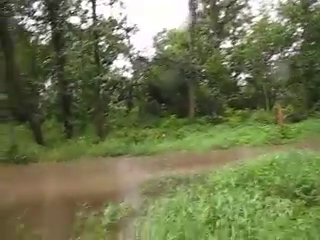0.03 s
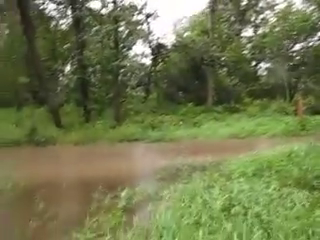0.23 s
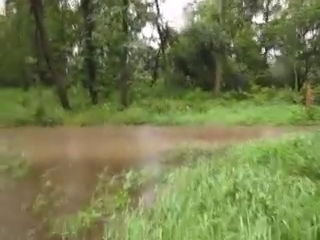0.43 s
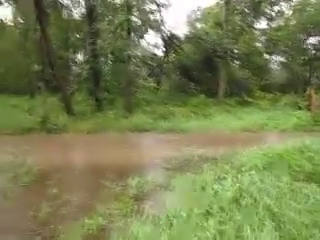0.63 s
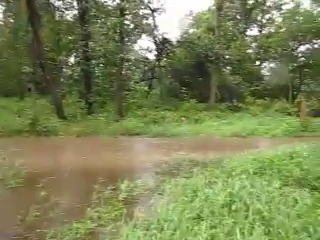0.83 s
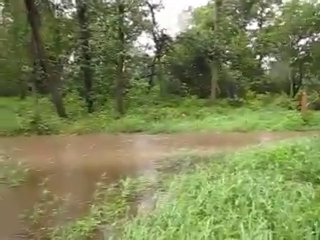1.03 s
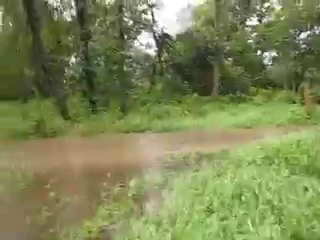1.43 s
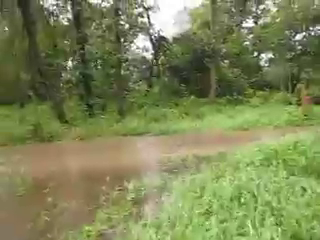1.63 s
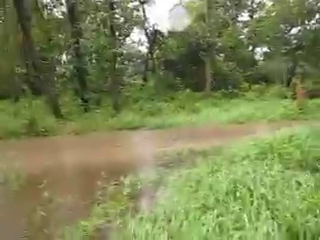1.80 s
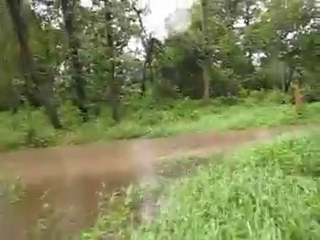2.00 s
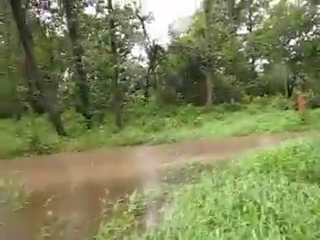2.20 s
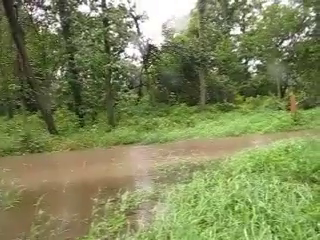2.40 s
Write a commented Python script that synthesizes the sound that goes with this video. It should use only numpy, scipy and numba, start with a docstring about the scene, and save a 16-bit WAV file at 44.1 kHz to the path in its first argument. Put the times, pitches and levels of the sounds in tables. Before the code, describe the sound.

Rain falls evenly over flooded, wooded ground. Big drops strike right by the microphone with sharp ticks, small plops and soft thumps, busy at first and sparser later, while light wind brushes the microphone.

```python
"""Rain with close drops

Steady rain hisses on grass, trees and flood water. Single drops strike a surface at the microphone:
each rings it briefly, thumps it and throws spray; some ping or plop in pockets of water.
Fine drops patter and crackle between them; light wind rumbles, with a few soft bumps.
The hardest hits overload the recorder, whose gain dips and creeps back."""
import sys
import numpy as np
from scipy import signal
from scipy.fft import rfft, irfft
from scipy.io import wavfile
from scipy.ndimage import uniform_filter1d
from numba import njit

SR = 44100
rng = np.random.default_rng(int(sys.argv[2]) if len(sys.argv) > 2 else 0)


def put_to_file(sound):
    """Save the sound as 16-bit audio at rate SR, in the file named by the first command-line argument."""
    columns = np.atleast_2d(sound).T  # one column per channel
    safe = np.clip(columns, -1, 1)
    whole_steps = np.round(safe * 32767)
    wavfile.write(sys.argv[1], SR, whole_steps.astype(np.int16))


N = 112454
HIT_S, RING_S = 0.005, 0.07  # level window, length of one short sound
RING_TIME_S = np.arange(int(RING_S * SR)) / SR


def near_drops():
    """Big drops strike the near surface one by one."""
    # start_s, ring_db, centre_hz, thump_db, spray_db, pan_db
    impacts = [(0.0445, -61, 590, -39.5, -35, 25), (0.053, -28, 3280, -46, -66, 11),
               (0.1113, -37, 1710, -33.5, -48, 0), (0.193, -35, 536, -31, -97, 15),
               (0.2125, -32.5, 4900, -37.5, -30, -4), (0.2568, -44, 4400, -65, -48, 6),
               (0.349, -44, 4600, -33.5, -35.5, 3), (0.358, -36, 2670, -34, -43, 9),
               (0.382, -37.5, 1450, -30.5, -41, 8), (0.3949, -39.5, 4770, -46, -38.5, 8),
               (0.414, -36.5, 1790, -33.5, -57, -8), (0.4238, -35.5, 1420, -38, -50, 29),
               (0.4457, -34.5, 4150, -40, -48, -14), (0.4901, -11.5, 1050, -20, -29.5, 8),
               (0.6143, -41.5, 3340, -44, -38, -18), (0.689, -37, 1500, -41, -53, -12),
               (0.709, -31, 378, -74, -71, 9), (0.7929, -32.5, 980, -25.5, -45.5, 7),
               (0.8021, -32.5, 710, -29.5, -55, 16), (0.879, -37, 446, -66, -49, 3),
               (0.902, -36, 955, -47, -36, 0), (0.9151, -28.5, 613, -45, -66, 20),
               (0.9446, -24, 1200, -28, -74, 17), (0.9763, -37, 2110, -53, -46.5, -15),
               (0.9934, -31.5, 706, -28.5, -66, 18), (1.0181, -60, 4200, -53, -43.5, 9),
               (1.0271, -28, 1420, -30, -37, 26), (1.0386, -34, 1320, -30, -70, 21),
               (1.1448, -27, 1570, -30.5, -26.5, -6.5), (1.2329, -20, 983, -22.5, -55, 2.5),
               (1.2547, -42, 2600, -53, -50.5, -19), (1.3051, -29.5, 1350, -32.5, -64, 12),
               (1.3084, -35.5, 756, -38, -53, 2), (1.342, -32, 784, -29, -64, -39),
               (1.3506, -27.5, 1530, -21, -28, -0.5), (1.3857, -48, 2280, -36, -47, -12),
               (1.4076, -34.5, 1280, -32, -63, 28), (1.4289, -24, 1034, -24, -48, 8.5),
               (1.4332, -29.5, 386, -46, -55, 28), (1.4836, -22, 1290, -37, -51, 12),
               (1.6212, -30, 714, -29, -73, 8), (1.6419, -29.5, 1140, -29.5, -43.5, -5),
               (1.7252, -33.5, 1050, -37, -74, -13), (1.751, -38.5, 2500, -47, -47, -8),
               (1.8924, -39, 1920, -70, -55, 10), (1.924, -46.5, 756, -53, -40.5, -6),
               (1.9727, -28, 2390, -30, -39, 13), (2.36, -36, 1970, -39, -37.5, -5),
               (2.4628, -42.5, 2630, -37.5, -47, -13), (2.5021, -37, 930, -31, -59, 2)]
    out = np.zeros((2, N))
    for start_s, *impact in impacts:
        add(out, start_s, drop(*impact))
    return out


def drop(ring_db, centre_hz, thump_db, spray_db, pan_db, echo_db=-11.5, echo_cycles=3.023, crack_db=-6):
    """One impact: contact crack, ring of the modes near centre_hz, low thump, tick of spray."""
    mode_hz, modes = surface_modes()
    struck = mode_weights(mode_hz, centre_hz, width_octaves=0.86) @ modes
    # the ring returns from the surface's edge within a few cycles
    lag_samples = (rng.random(2) + 1) / 2 * echo_cycles / centre_hz * SR
    echo = np.array([np.roll(side, int(lag)) for side, lag in zip(struck, lag_samples)])
    ring = unit(struck + undb(echo_db) * echo)
    hardness = min(centre_hz / 1540, 1) ** 2  # softer drops ring lower and crack less
    crack = undb(crack_db) * hardness * burst(low_hz=2300, high_hz=4440, t60_s=0.004)
    thump = unit(mode_weights(mode_hz, centre_hz=214, width_octaves=1) @ modes)
    spray = burst(low_hz=3600, high_hz=11600, t60_s=0.0071)
    return (hit_gain(ring_db, pan_db) * (ring + crack)
            + hit_gain(thump_db, 0.53 * pan_db) * thump
            + hit_gain(spray_db, 0.21 * pan_db - 3) * spray)


def surface_modes(pitch_scatter=0.11, scatter_db=5.5, settle_hz=2030):
    """Decaying modes vary with the place of impact; pitches above settle_hz vary little."""
    # pitch_hz, level_db, t60_s
    resonances = [(150, -1.5, 0.025), (212.4, -2, 0.024), (324, 0, 0.019), (448, 2, 0.013),
                  (632, -0.5, 0.029), (839, 3, 0.017), (1193, 3.5, 0.0076), (1554, 4.5, 0.015),
                  (2050, 5.5, 0.0067), (2960, 7.5, 0.0045), (3620, 8.5, 0.0072), (4520, 8.5, 0.0087),
                  (7300, 5, 0.0068), (12400, 3, 0.0076)]
    pitch_hz, level_db, t60_s = np.array(resonances, float).T
    count = len(pitch_hz)
    detune = rng.standard_normal((2, count, 1)) / np.hypot(1, pitch_hz[:, None] / settle_hz)
    detuned_hz = pitch_hz[:, None] * np.exp(pitch_scatter * detune)
    uneven_db = scatter_db * rng.uniform(-1.38, 1, (2, count, 1))
    swing = (-1) ** np.arange(count) * undb(level_db) / np.sqrt(t60_s)  # neighbours in antiphase
    envelope = swing[:, None] * decay(RING_TIME_S, t60_s[:, None]) * undb(uneven_db)
    return pitch_hz, np.sin(2 * np.pi * detuned_hz * RING_TIME_S) * envelope


def mode_weights(mode_hz, centre_hz, width_octaves):
    """An impact drives the modes near its centre pitch hardest."""
    return np.exp(-0.5 * (np.log2(mode_hz / centre_hz) / width_octaves) ** 2)


def pings(left_lag_s=0.00003, reference_hz=1490, reference_t60_s=0.013):
    """Struck pockets of water and air ring on one note: plops when low, glassy ticks when high."""
    # start_s, pitch_hz, level_db, pan_db
    pockets = [(0.2568, 4600, -31.5, -3), (0.491, 550, -17, 3), (0.491, 190, -24, 2), (0.491, 2730, -30, 0),
               (0.491, 4850, -28, 0), (0.6145, 2260, -35.5, -20), (0.8795, 800, -36, 18),
               (1.0272, 1895, -24.5, 7.5), (1.1447, 640, -28.5, -10), (1.1448, 5000, -23.5, -36),
               (1.1448, 10700, -27, -14), (1.2328, 399, -20, 15), (1.232, 3870, -32, 0),
               (1.3507, 11200, -20, -17), (1.6212, 526, -23.5, 25), (1.751, 2500, -36, -10),
               (1.777, 2490, -39.5, -7), (1.9728, 740, -31, 22), (1.973, 4940, -33.5, 10)]
    out = np.zeros((2, N))
    time_s = np.maximum(RING_TIME_S - np.array([[left_lag_s], [0]]), 0)
    for start_s, pitch_hz, level_db, pan_db in pockets:
        t60_s = reference_t60_s * (reference_hz / pitch_hz) ** 0.64
        note = np.sin(2 * np.pi * pitch_hz * time_s) * decay(time_s, t60_s)
        add(out, start_s, hit_gain(level_db, pan_db) * unit(note))
    return out


def patter(rate_per_s=79, typical_hz=1910, spread_octaves=0.57, scatter_db=3.5, pan_spread_db=5):
    """Fine drops land at random times and places on the same surface."""
    # time_s, level_db
    typical_levels = [(0, -46), (.2, -43.5), (.42, -46.5), (.55, -52.5), (.9, -45.5), (1.35, -48),
                      (1.55, -54), (2.0, -57), (2.55, -52)]
    out = np.zeros((2, N))
    for _ in range(int(rate_per_s * N / SR)):
        start_s = rng.random() * N / SR
        size, colour, weight, wetness, place = np.clip(rng.standard_normal(5), -2, 2)
        ring_db = curve(typical_levels, start_s) + scatter_db * size
        centre_hz = typical_hz * 2 ** (spread_octaves * colour)
        thump_db = ring_db - 18 + scatter_db * weight
        spray_db = ring_db - 14 + scatter_db * wetness
        add(out, start_s, drop(ring_db, centre_hz, thump_db, spray_db, pan_spread_db * place))
    return out


def crackle(start_s=0.33, end_s=0.39, rate_per_s=400, level_db=-54.5, scatter_db=3, pan_spread_db=5):
    """A brief shower of tiny droplets ticks brightly, too light to ring the surface."""
    out = np.zeros((2, N))
    length_s = end_s - start_s
    for _ in range(int(rate_per_s * length_s)):
        size, place = np.clip(rng.standard_normal(2), -2, 2)
        tick = burst(low_hz=4500, high_hz=15000, t60_s=0.0068)
        gain = hit_gain(level_db + scatter_db * size, pan_spread_db * place)
        add(out, start_s + rng.random() * length_s, gain * tick)
    return out


def rain(time_s, grains_per_s=1500, grain_db=-2, flicker_db=1.05):
    """Countless far drops merge into a hiss; nearer ones on grass and water give it grain."""
    # frequency_hz, density_db
    spectrum = [(100, 4.5), (300, -7), (600, -3.5), (1000, -1), (1800, 1.5), (2800, 3), (4200, -1.5),
                (6000, -9.5), (8500, -18.6), (11500, -24), (13000, -27), (16000, -33)]
    # frequency_hz, left_right_correlation
    correlation = [(100, 0.7), (650, 0.86), (1400, 0.43), (3000, -0.044), (7000, -0.24), (15000, -0.1)]
    # time_s, level_db
    levels = [(0, -46.5), (.35, -44.5), (.7, -45.5), (1.25, -43), (1.75, -44.5), (2.05, -43), (2.55, -44.5)]
    grains = (rng.random((2, N)) < grains_per_s / SR) * rng.standard_normal((2, N))
    grainy_noise = rng.standard_normal((2, N)) + undb(grain_db) * unit(grains)
    hiss = stereo_noise(grainy_noise, spectrum, by_hz(correlation))
    return hiss * undb(curve(levels, time_s) + flicker_db * wander(rate_hz=25.6))


def wind(time_s):
    """Light puffs rumble on the microphone."""
    # frequency_hz, density_db
    spectrum = [(20, -13), (45, -6), (72, -4), (130, -4), (200, -11.5), (350, -11.5), (700, -18.5),
                (2000, -60)]
    # time_s, level_db
    levels = [(0, -39), (.04, -40), (.08, -55), (.21, -37.5), (.27, -52), (.43, -41.5), (.5, -47.5),
              (.8, -45.5), (1.09, -45), (1.29, -41.5), (1.42, -33.5), (1.53, -46.5), (1.65, -44),
              (1.82, -56), (2.03, -52), (2.19, -46), (2.28, -51.5), (2.55, -43.5)]
    rumble = stereo_noise(rng.standard_normal((2, N)), spectrum, correlation=0.42)
    return rumble * pan(pan_db=3) * undb(curve(levels, time_s))


def bumps(rise_cycles=0.35):
    """Soft low pushes on the microphone swell and die within a cycle or two."""
    # start_s, pitch_hz, level_db, pan_db
    pushes = [(0.112, 99, -33.5, 12), (1.029, 132, -25, 4), (1.179, 135, -31.5, 0.5),
              (1.2326, 200, -22.5, 0), (1.389, 128, -27.5, -5), (1.403, 138, -34, 2),
              (1.426, 124, -31.5, -11), (1.975, 150, -37, 8), (2.199, 171, -35, 13),
              (2.3848, 208, -34.5, -6)]
    out = np.zeros((2, N))
    for start_s, pitch_hz, level_db, pan_db in pushes:
        cycles = pitch_hz * RING_TIME_S
        age = cycles / rise_cycles
        push = np.sin(2 * np.pi * cycles) * age * np.exp(-age)
        add(out, start_s, hit_gain(level_db, pan_db) * unit(push))
    return out


def undb(db):
    """Decibels to gain."""
    return 10 ** (np.asarray(db) / 20)


def unit(x):
    """Scale to rms 1."""
    return x / np.sqrt(np.mean(x ** 2) + 1e-20)


def pan(pan_db):
    """Constant-power gains; pan_db is left minus right."""
    return unit(undb(np.array([[pan_db], [-pan_db]]) / 2))


def hit_gain(level_db, pan_db):
    """Stereo gains that give a short sound of rms 1 the energy of level_db held for HIT_S."""
    return np.sqrt(HIT_S / RING_S) * undb(level_db) * pan(pan_db)


def decay(time_s, t60_s):
    """Fall of 60 dB per t60_s."""
    return np.exp(-np.log(1000) * time_s / t60_s)


def burst(low_hz, high_hz, t60_s):
    """Fading stereo band noise, rms 1."""
    band = signal.butter(2, [low_hz, high_hz], "band", fs=SR, output="sos")
    noise = rng.standard_normal((2, len(RING_TIME_S)))
    return unit(signal.sosfilt(band, noise * decay(RING_TIME_S, t60_s)))


def curve(table, time_s):
    """Interpolate rows of time_s, value."""
    return np.interp(time_s, *np.array(table, float).T)


def by_hz(table):
    """Interpolate rows of frequency_hz, value at each FFT bin, on a log axis."""
    frequency_hz, value = np.array(table, float).T
    bin_hz = np.arange(N // 2 + 1) * SR / N
    return np.interp(np.log(bin_hz + 1), np.log(frequency_hz), value)


def stereo_noise(pair, spectrum, correlation):
    """Colour two independent noises and mix them to left and right, rms 1."""
    mid, side = rfft(pair) * undb(by_hz(spectrum))
    mid, side = mid * np.sqrt(1 + correlation), side * np.sqrt(1 - correlation)
    return unit(irfft(np.array([mid + side, mid - side]), N))


def wander(rate_hz):
    """Ramps between random values, rms 1."""
    hold = int(SR / rate_hz)
    steps = np.repeat(rng.standard_normal(N // hold + 1), hold)
    return unit(uniform_filter1d(steps, hold)[:N])


def add(out, start_s, sound):
    """Mix a short sound in at start_s."""
    i = int(np.clip(start_s * SR, 0, N - 1))
    out[:, i:i + sound.shape[1]] += sound[:, :N - i]


@njit
def follow_peaks(x, attack_s, release_s):
    """Catch each peak, let it sink, smooth the rise."""
    envelope, peak, smoothed = np.empty(len(x)), 0., 0.
    for i in range(len(x)):
        peak = max(x[i], peak * (1 - 1 / (release_s * SR)))
        smoothed += (peak - smoothed) / (attack_s * SR)
        envelope[i] = smoothed
    return envelope


def scene(surface_cut_hz=153):
    """Close drops over rain and wind."""
    time_s = np.arange(N) / SR
    # the small surface radiates little below its lowest mode
    radiation = signal.butter(5, surface_cut_hz, "high", fs=SR, output="sos")
    surface = signal.sosfilt(radiation, near_drops() + patter() + pings())
    return surface + wind(time_s) + rain(time_s) + bumps() + crackle()


def record(dry, threshold=0.17, duck_db_per_db=0.2, low_cut_hz=56, high_cut_hz=16300):
    """Gain control ducks after hard hits; overs clip; deep bass and top are cut."""
    peak = follow_peaks(np.abs(dry).max(axis=0), attack_s=0.0018, release_s=0.65)
    ducked = dry * np.maximum(peak / threshold, 1) ** -duck_db_per_db
    low_cut = signal.butter(2, low_cut_hz, "high", fs=SR, output="sos")
    high_cut = signal.ellip(8, 0.2, 70, high_cut_hz, fs=SR, output="sos")
    thinned = signal.sosfilt(low_cut, np.clip(ducked, -1, 1))
    return signal.sosfilt(high_cut, thinned)


dry = scene()
out = record(dry)
put_to_file(out)
```